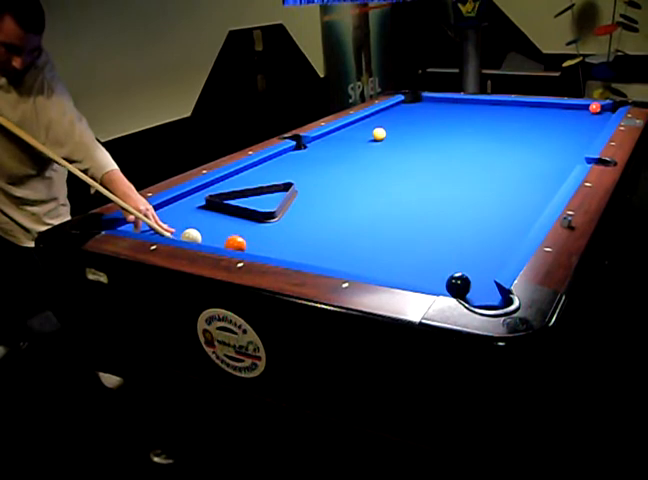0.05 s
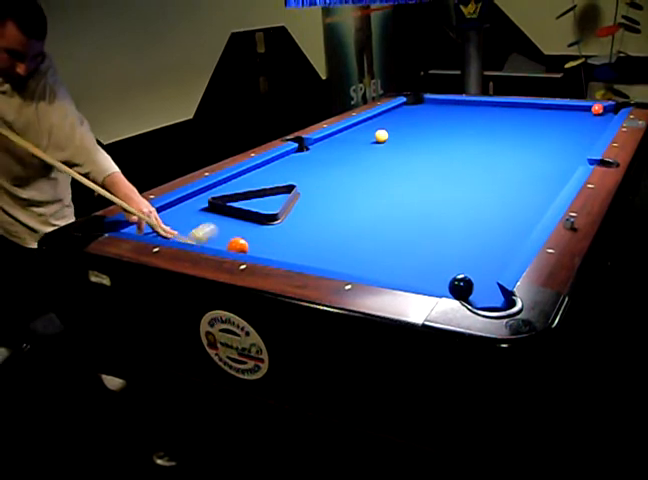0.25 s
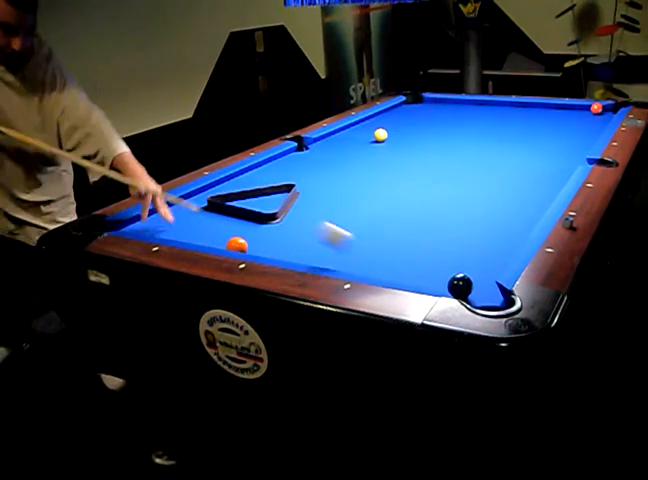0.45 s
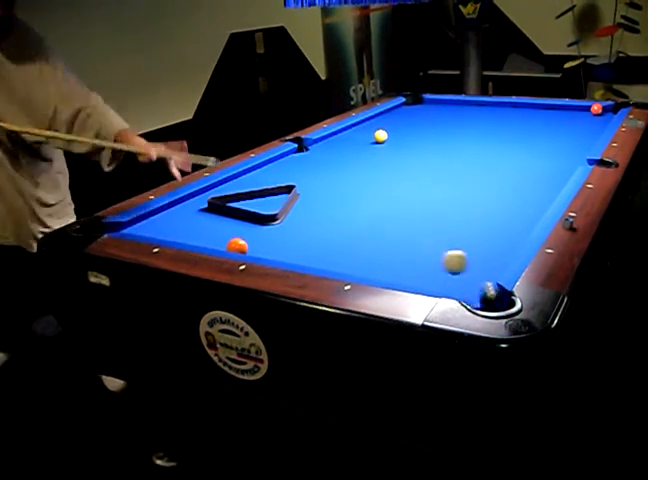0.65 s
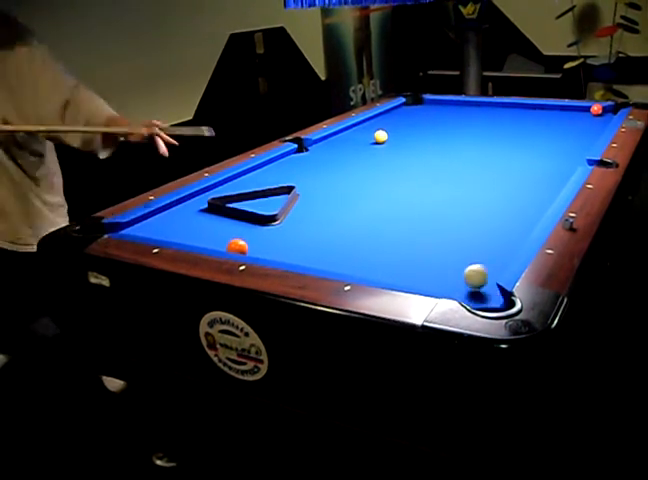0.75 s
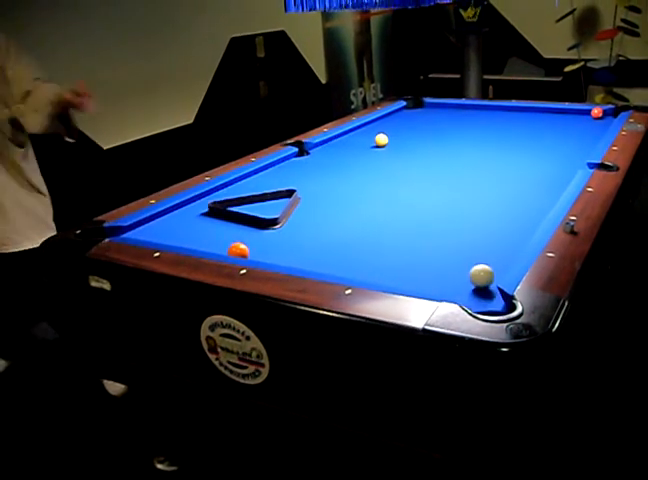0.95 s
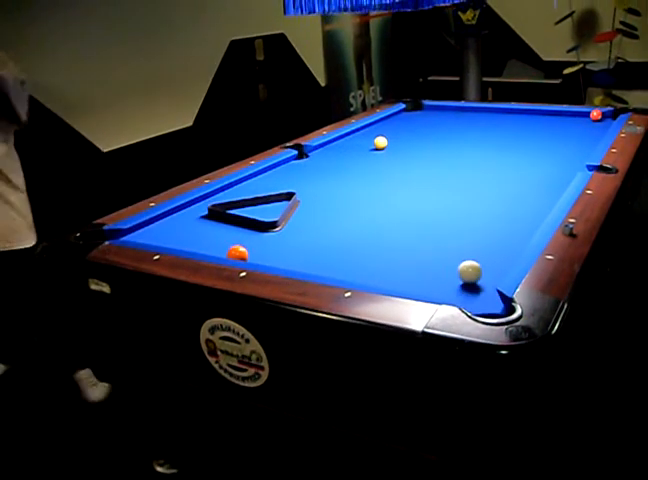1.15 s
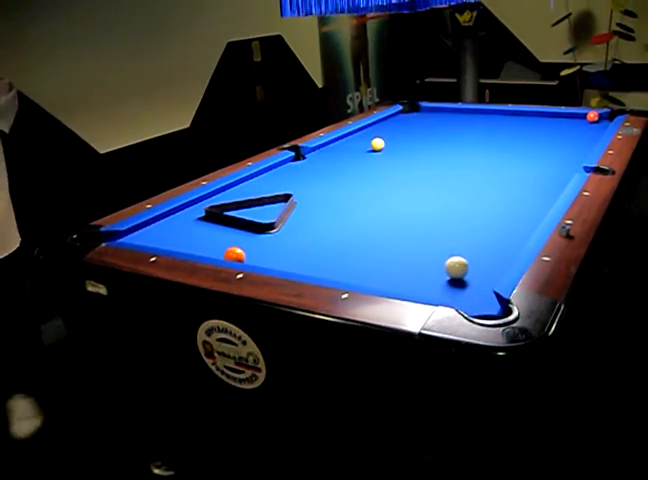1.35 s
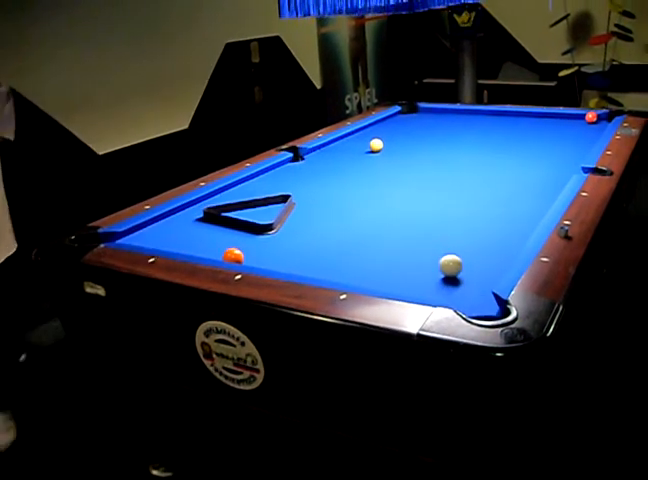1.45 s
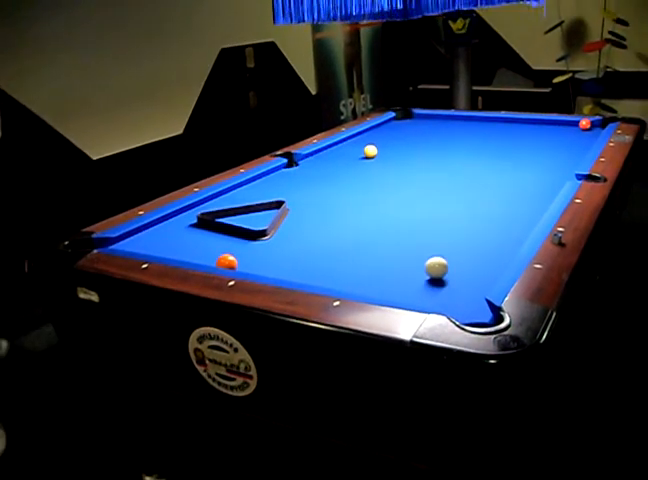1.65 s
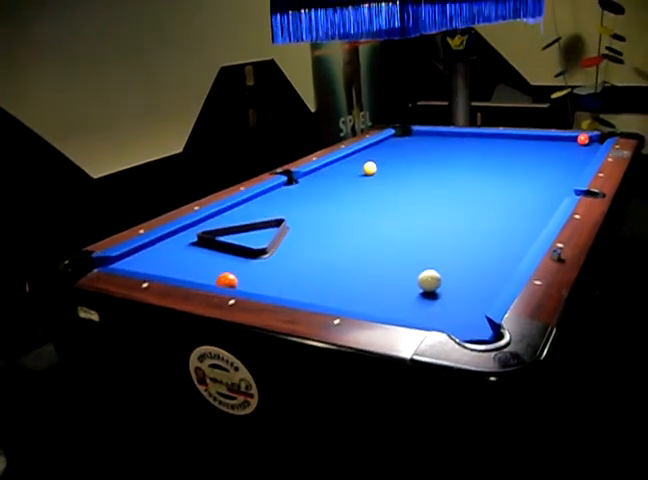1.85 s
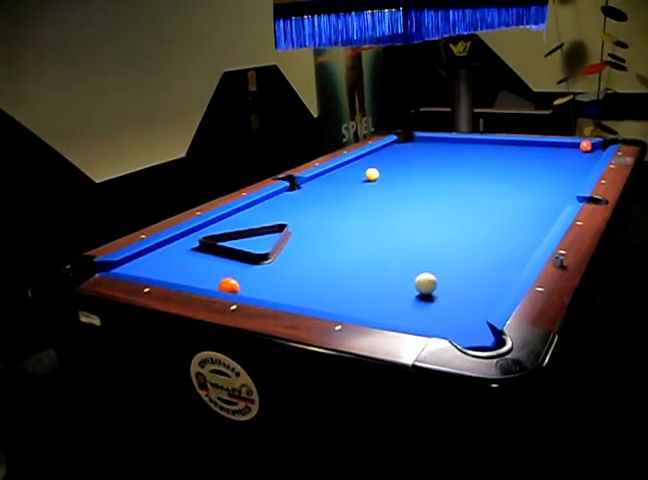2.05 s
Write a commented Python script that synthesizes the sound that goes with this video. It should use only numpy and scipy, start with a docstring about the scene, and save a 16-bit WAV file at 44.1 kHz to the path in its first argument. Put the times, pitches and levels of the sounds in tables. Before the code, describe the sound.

A pool shot: cue knock, loud ball clack, then a ball knocking into the pocket.

```python
"""First comes a sharp knock: a pool cue drives the white ball into the slate for a jump shot.
The ball flies, clacks against the black and knocks it into the corner pocket. Each hit is a short
pulse that sets the table ringing and echoes around a hard-walled room. Small knocks follow while the
potted ball rumbles and whirrs away inside the table. A faint hiss lies under it all, and a soft
rustle swells at the end."""
import sys
import numpy as np
from scipy import signal
from scipy.fft import rfft, irfft
from scipy.io import wavfile

SR = 44100
rng = np.random.default_rng(int(sys.argv[2]) if len(sys.argv) > 2 else 0)


def waveform_to_disk(signal):
    """Save audio, clipped to [-1, 1], as 16-bit WAV at the path in sys.argv[1]."""
    frames = np.transpose(np.atleast_2d(signal))
    scaled = np.clip(frames, -1, 1) * 32767
    samples = np.round(scaled).astype(np.int16)
    wavfile.write(sys.argv[1], SR, samples)


N = 92610

# the tone colour (spectrum) of each kind of hit (frequency [Hz], relative level [dB])
CUE = [(35, -30), (70, -24), (95, -6.5), (140, -15.5), (280, -7), (370, -9.5), (460, -2), (720, -2),
       (810, -6.5), (1020, -22), (1400, -17), (1800, -19), (2090, -14.5), (2400, -24), (2900, -25),
       (3300, -20), (4400, -24.5), (5250, -26), (5700, -29), (11000, -40)]
CLACK = [(40, -28), (70, -40), (130, -22.5), (300, -16), (390, -14.5), (480, -5.5), (680, -3), (810, -3),
         (890, -11), (1100, -8.5), (1300, -11), (1510, -7), (1740, -8), (1860, -6.5), (2250, -14),
         (2700, -17.5), (2870, -22), (3250, -21), (4000, -30.5), (4600, -36), (8000, -42), (11000, -40)]
POCKET = [(35, -36), (95, -7.5), (180, -15), (280, -8), (380, -10.5), (560, 0), (790, 2), (920, -10),
          (1600, -10.5), (2300, -18), (3300, -33.5), (5500, -34.5), (7500, -46), (11000, -42)]
RIM = [(60, -21.5), (260, 2), (500, -8), (1000, -1), (2000, -0.5), (3000, -14), (3900, -15), (4300, -19),
       (5200, -15.5), (5900, -19.5), (6600, -23.5), (11000, -29.5)]
RATTLE = [(200, 6), (700, 1.5), (1500, 8.5), (2300, 7.5), (3200, 2.5), (3700, -6.5), (4400, -6.5),
          (5200, -25), (10000, -21)]
KNOCK = [(60, -35), (200, -28), (380, -0.5), (600, 3), (1100, 1.5), (1900, 0.5), (2800, -10.5), (5000, -10),
         (7000, -21), (11000, -25)]
TAP = [(100, -34), (400, -8.5), (700, 1), (1300, -10.5), (1850, -7.5), (2600, -26), (4000, -33),
       (5000, -17.5), (6300, -20), (7200, -31), (11000, -38)]
THUD = [(35, -27), (70, -32), (100, 8.5), (140, -13.5), (300, -8), (800, -6.5), (1500, -11.5), (4000, -49),
        (11000, -45)]
# the hits (time [s], overall gain [dB], direct gain [dB], table gain [dB], echo length [x], spectrum)
HITS = [ (0.2209, -2.5, -14, 1.5, 0.86, CUE), (0.4757, 7, -19.5, 0, 1.22, CLACK),
        (0.5452, -9.5, -9, -2, 1.07, RATTLE), (0.7040, -4.5, -16.5, 3.5, 1.02, RIM),
        (0.7095, 0.96, -13, -7, 0.82, POCKET), (0.8050, -8.5, -19.5, -5.5, 0.78, POCKET),
        (0.8750, -18.5, -18, 1.5, 0.24, THUD), (1.0840, -24, -14.5, -7, 1.3, TAP),
        (1.1855, -18.5, -13.5, -3.5, 1.42, KNOCK), ]
# the notes the table rings with (frequency [Hz], relative level [dB], time to fade by 60 dB [s])
TABLE_NOTES = [(42, -21.5, 0.65), (101.3, -33.5, 0.75), (308.7, -15, 0.79), (445.6, -19, 0.43),
               (553, -16, 0.48), (692.4, -16, 0.53), (791, -11.5, 0.38), (819, -11.5, 0.47),
               (968.5, -9.5, 0.4), (1065, -16, 0.73), (1500, -14.5, 0.28), (1570, -22, 0.94),
               (1838, -14, 0.68), (1926, -21, 0.63), (2090, -15, 0.2), (2780, -8.5, 0.21)]
# short rings where things touch (time [s], frequency [Hz], gain [dB], time to fade by 60 dB [s])
SNAPS = [ (0.2212, 5140, -37.5, 0.0083), (0.2220, 698, -35.5, 0.22), (0.4755, 1507, -23.5, 0.061),
         (0.4874, 1858, -25, 0.069), (0.544, 4250, -41.5, 0.02), (0.5490, 3230, -33.5, 0.042),
         (0.7020, 274, -23.5, 0.039), (1.0843, 4870, -53, 0.008), (1.0935, 4950, -52, 0.013),
         (1.1855, 3860, -44, 0.0076), (1.1841, 1616, -49.5, .1), ]
# echoes from nearby surfaces (delay [s], level against the direct sound [dB])
NEAR_ECHOES = [(.0024, 1), (.0056, 3.5), (.0093, 2.5), (.0121, -2.5), (.0146, -5.5), (.0157, 1),
               (.0185, -2.5), (.0262, 3)]
# sharp echoes of the clack off hard surfaces (time [s], energy [dB])
SHARP_ECHOES = [(0.4935, -17), (0.5862, -32)]
# their tone colour (frequency [Hz], relative level [dB])
SHARP_ECHO_SPECTRUM = [(500, -22), (2500, -6), (4500, 4), (7000, 5), (8200, -2), (10000, -1), (11500, -14)]
# the room's echo, before each hit stretches it (frequency [Hz], time to fade by 60 dB [s])
ROOM_FADE = [(60, 1.0), (120, 0.61), (260, 0.95), (700, 0.61), (1800, 0.5), (3200, 0.5), (5500, 0.45),
             (10000, 0.51)]
# how loud the rolling ball's three sounds are (time [s], level [dB])
RUMBLE_LEVEL = [(.85, -81), (1.0, -90), (1.15, -69), (1.3, -64), (1.42, -72.5), (1.53, -80.5), (2.1, -103)]
WHIRR_LEVEL = [(.9, -88), (1.3, -78), (1.56, -77), (1.66, -76), (1.83, -75.5), (1.92, -71.5), (2.1, -72)]
SING_LEVEL = [(1.62, -88), (1.69, -71), (1.76, -72), (1.82, -95)]
# the rolling ball's tone colours (frequency [Hz], relative level [dB])
RUMBLE_SPECTRUM = [(30, -16), (70, -23), (100, 4), (130, -8.5), (180, -0.5), (280, -12.5), (600, -16),
                   (2000, -54)]
WHIRR_SPECTRUM = [(60, -35), (150, -6), (200, 0.5), (270, -16), (370, -12), (430, -32), (630, -10),
                  (780, -6.5), (1200, -9), (1700, -26), (2500, -18), (8000, -22)]
# the notes of the hollow channel it rolls along (frequency [Hz], relative level [dB])
CHANNEL_NOTES = [(200, -11.5), (370, -4.5), (490, -7), (623, -4)]
# the background's tone colours (frequency [Hz], relative level [dB])
HISS_SPECTRUM = [(18, -46), (30, -10), (153, -12.5), (222, -9), (412, -5.5), (443, -8), (642, -1.5),
                 (864, -10), (1950, -3.5), (2100, -7.5), (7590, -10), (11000, -12), (14300, -23),
                 (22000, -120)]
RUSTLE_SPECTRUM = [(200, -12), (1500, -13), (4000, 0), (7500, -3), (11000, -6)]
# how the rustle swells (time [s], level [dB])
RUSTLE_LEVEL = [(1.98, -94), (2.06, -76.5), (2.1, -48.5)]
# how the microphone softens the highest sounds (frequency [Hz], gain [dB])
MIC_TREBLE = [(10000, 0), (10600, -3), (11300, -10), (12000, -19)]

BASS_RISE_CYCLES = 4.4  # table and room build up over a few vibrations, so low notes start slowly


def hits():
    """Each hit reaches us directly, through the ringing table and through the room."""
    out, paths = np.zeros(N), near_paths()
    for start, db, direct_db, table_db, stretch, spectrum in HITS:
        response = amp(direct_db) * paths + amp(table_db) * table_ring() + room_echo(stretch)
        add(out, start, amp(db) * signal.fftconvolve(response, contact_pulse(spectrum)))
    for start, db in SHARP_ECHOES:
        add(out, start, amp(db) * contact_pulse(SHARP_ECHO_SPECTRUM))
    return out


def contact_pulse(spectrum, size=4096):
    """Two hard things meet: a sudden click with the given tone colour and an energy of one."""
    log_gain = np.log(amp(read(spectrum, abs(np.fft.fftfreq(size, 1 / SR)))))
    front_loaded = np.exp(np.conj(signal.hilbert(log_gain)))  # puts the energy as early as possible
    pulse = np.fft.ifft(front_loaded).real[:size // 2]
    return pulse / np.linalg.norm(pulse)


def snaps():
    """The spot that is struck rings briefly, and we hear it directly."""
    out, t = np.zeros(N), np.arange(SR // 4) / SR
    for start, hz, db, fade_s in SNAPS:
        swell = 1 - np.exp(-t * hz / 1.3)  # builds up over about 1.3 vibrations
        add(out, start, amp(db - 60 * t / fade_s) * swell * np.sin(2 * np.pi * hz * t))
    return out


def table_ring(rise_s=0.013, gain_db=-12.5):
    """The slate and cabinet shake at their own notes, which build up and die away."""
    ring, t = np.zeros(N), np.arange(N) / SR
    for hz, db, fade_s in TABLE_NOTES:
        swell = 1 - np.exp(-t / (rise_s + BASS_RISE_CYCLES / hz))
        note = np.sin(2 * np.pi * (hz * t + rng.random())) * amp(-60 * t / fade_s) * swell
        ring += amp(db + gain_db) * note / np.linalg.norm(note)
    return ring


def near_paths(low_cut_hz=650):
    """The direct sound and its first echoes; small surfaces throw back little bass."""
    paths = np.zeros(N)
    for delay, db in NEAR_ECHOES:
        add(paths, delay, amp([db]))
    paths = signal.lfilter(*signal.butter(2, low_cut_hz, "high", fs=SR), paths)
    paths[0] += 1  # the direct sound
    return paths


def room_echo(stretch, rise_s=0.0092, early_db=3, early_s=0.045, size=256):
    """Many wall echoes blur into a wash that swells, then fades at its own speed for each pitch."""
    wash = rng.standard_normal(N)
    for window in (size * 8, size * 16):  # even out the noise so that no pitch sticks out
        bands = signal.stft(wash, nperseg=window)[2]
        wash = signal.istft(bands / (abs(bands) + 1e-12), nperseg=window)[1][:N]
    hz, t, bands = signal.stft(unit(wash), SR, nperseg=size)
    fade_s = stretch * read(ROOM_FADE, hz)[:, None]
    shape = amp(-60 * t / fade_s + early_db * np.exp(-t / early_s))
    cycles = (t + t[1]) * np.maximum(hz, hz[1] / 2)[:, None]
    shape *= 1 - np.exp(-cycles / BASS_RISE_CYCLES)
    shape /= np.sqrt((shape ** 2).sum(1, keepdims=True) * size / 2)  # same energy in every band
    swell = 1 - np.exp(-np.arange(N) / SR / rise_s)
    return signal.istft(bands * shape, SR, nperseg=size)[1][:N] * swell


def rolling_ball():
    """The potted ball rumbles, then whirrs along the hollow return channel and sings faintly."""
    whirr = noise(WHIRR_SPECTRUM) + sum(amp(db) * tone(hz, width_hz=4.4) for hz, db in CHANNEL_NOTES)
    rumble = noise(RUMBLE_SPECTRUM) * loudness(RUMBLE_LEVEL)
    sing = tone(centre_hz=1636, width_hz=10) * loudness(SING_LEVEL)
    return rumble + whirr * loudness(WHIRR_LEVEL) + sing


def background(hiss_db=-64.5, whine_db=-78.5):
    """A steady hiss with a thin, high whine; a soft rustle swells at the end."""
    rustle = noise(RUSTLE_SPECTRUM) * loudness(RUSTLE_LEVEL)
    hiss = amp(hiss_db) * noise(HISS_SPECTRUM)
    whine = amp(whine_db) * tone(centre_hz=7870, width_hz=54)
    return hiss + whine + rustle


def noise(spectrum):
    """Steady noise with the given tone colour."""
    gain = amp(read(spectrum, np.fft.rfftfreq(N, 1 / SR)))
    return unit(irfft(rfft(rng.standard_normal(N)) * gain, N))


def tone(centre_hz, width_hz):
    """A wavering note: noise narrowed down to around one pitch."""
    offset = (np.fft.rfftfreq(N, 1 / SR) - centre_hz) / width_hz
    return unit(irfft(rfft(rng.standard_normal(N)) / (1 + offset ** 2), N))


def loudness(points):
    """A volume curve through the given points, silent before the first."""
    return amp(np.interp(np.arange(N) / SR, *np.transpose(points), left=-np.inf))


def amp(db):
    """Turns decibels into a number to multiply by."""
    return 10 ** (np.asarray(db) / 20)


def unit(x):
    """Scales a sound to an average power of one."""
    return x / np.sqrt(np.mean(x ** 2) + 1e-20)


def read(points, hz):
    """Reads between the rows of a table, with frequencies spaced like musical pitch."""
    row_hz, value = np.transpose(points)
    return np.interp(np.log(hz + 1), np.log(row_hz + 1), value)


def add(mix, start_s, sound):
    """Mixes a sound in at the given time."""
    part = mix[max(round(start_s * SR), 0):][:len(sound)]
    part += sound[:len(part)]


def scene():
    """The shot, the rolling ball and the quiet room, in one channel."""
    return (hits() + snaps() + rolling_ball() + background())[None]


def record(dry, cutoff_hz=12279):
    """The microphone softens the top treble, then a filter removes what lies above the cutoff."""
    mic_gain = amp(read(MIC_TREBLE, np.fft.rfftfreq(2 * N, 1 / SR)))
    softened = irfft(rfft(dry, 2 * N) * mic_gain)[:, :N]
    lowpass = signal.firwin(511, cutoff_hz, window=("kaiser", 9), fs=SR)
    return signal.oaconvolve(softened, lowpass[None], "same")


dry = scene()
out = record(dry)
waveform_to_disk(out)
```